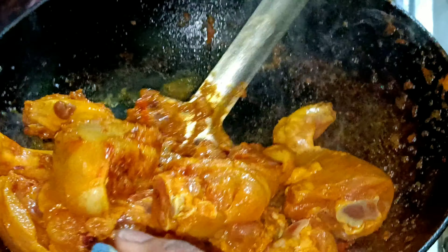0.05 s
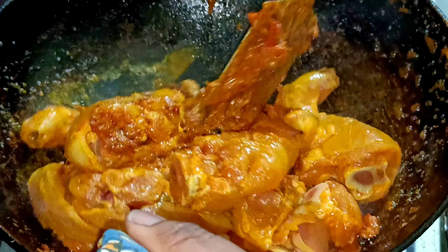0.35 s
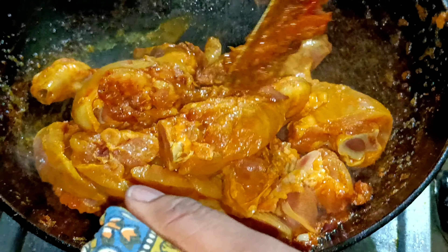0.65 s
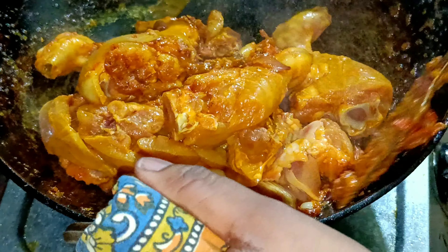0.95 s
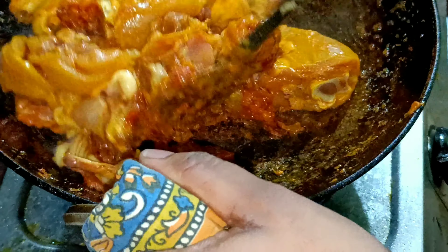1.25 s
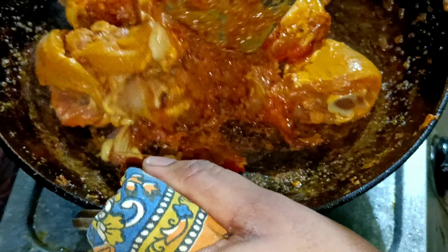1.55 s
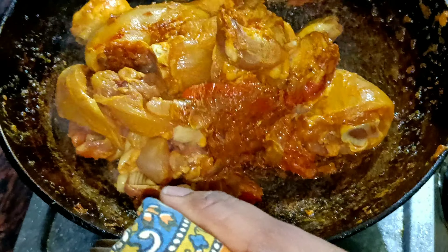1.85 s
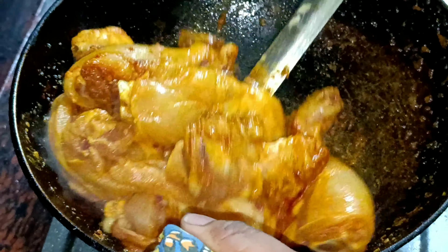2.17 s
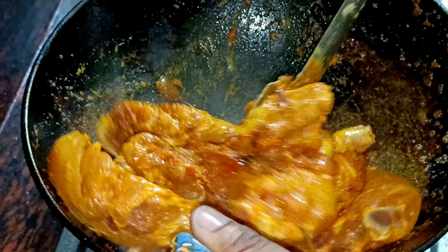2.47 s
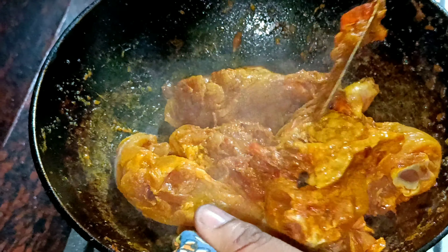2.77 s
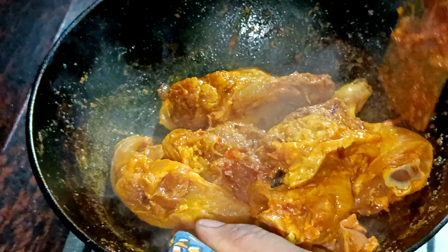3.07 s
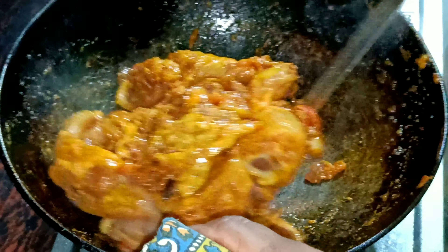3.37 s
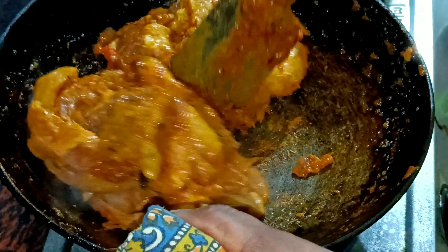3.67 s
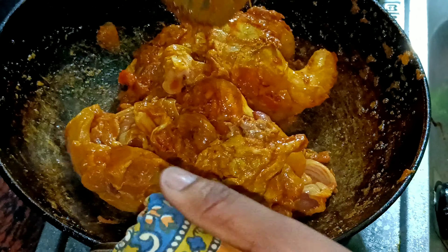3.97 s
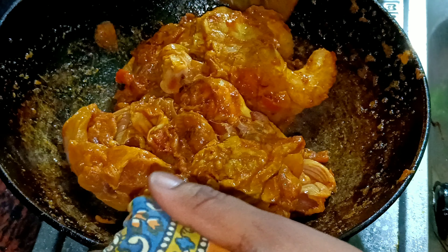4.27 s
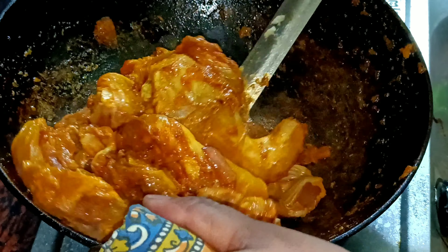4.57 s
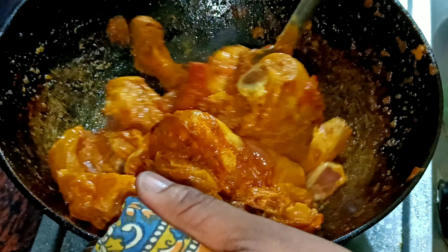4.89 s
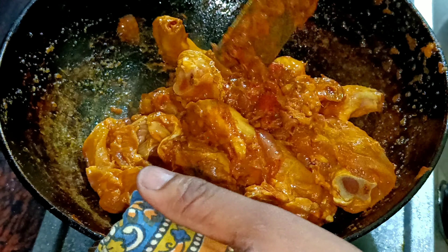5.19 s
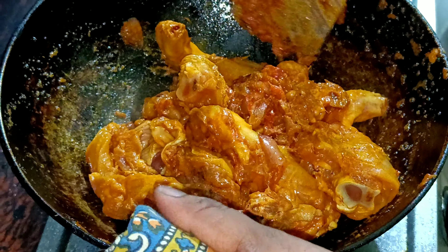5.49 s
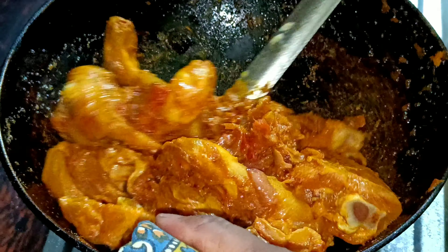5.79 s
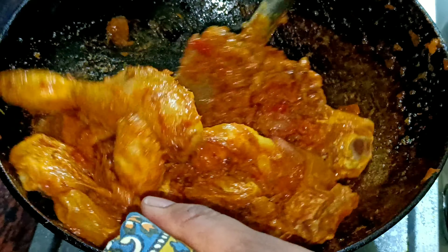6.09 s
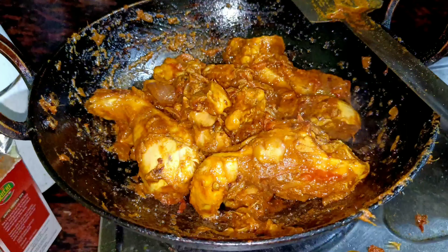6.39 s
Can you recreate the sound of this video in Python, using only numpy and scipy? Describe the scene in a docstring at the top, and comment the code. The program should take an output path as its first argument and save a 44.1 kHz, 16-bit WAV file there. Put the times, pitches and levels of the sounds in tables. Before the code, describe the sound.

In a kitchen with a low background rumble, hot oil sizzles close up from start to finish, rising and falling in quick, uneven waves as the food is stirred. A metal ladle strikes the pan at irregular moments, each clink ringing briefly. Further away, wooden thuds sound with a little room echo, three of them heavier and rebounding. The frying eases slightly toward the end.

```python
"""Food frying in a pan, close up, under a half-lifted aluminium lid: oil droplets burst and hiss.
Each stroke of a metal ladle swells the hiss; now and then the ladle clinks and rings the pan.
Dull knocks on wood come from across the kitchen, over a low rumble; the heavy ones rebound.
The right microphone port resonates near 6 kHz. The sound drops out briefly just before the end."""
import sys
import numpy as np
from scipy import signal
from scipy.fft import rfft, irfft, next_fast_len
from scipy.io import wavfile
from scipy.ndimage import uniform_filter1d, map_coordinates

SR = 44100
rng = np.random.default_rng(int(sys.argv[2]) if len(sys.argv) > 2 else 0)


def transcribe(signal):
    """Save signal, clipped to [-1, 1], as a 16-bit WAV file at the path in sys.argv[1]."""
    frames = np.atleast_2d(signal).T
    limited = np.clip(frames, -1, 1)
    pcm = np.round(limited * 32767).astype(np.int16)
    wavfile.write(sys.argv[1], SR, pcm)


N = 288413

# room sound, left against right: f/Hz, coherence
COHERENCE = [(25, 0.73), (60, 0.99), (250, 1), (500, 0.81), (1000, 0.028), (2000, 0.0094), (12000, 0.027)]
# bursting oil droplets: f/Hz, level/dB
SIZZLE_SPECTRUM = [(800, -18), (2500, 0.5), (6500, 1.5), (9200, -1.5), (12000, 1), (14000, 0),
                   (15600, -3.5)]
# frying hiss: f/Hz, level/dB
HISS_SPECTRUM = [(200, -29), (600, -15), (1280, -2.5), (1700, -0.5), (2100, -1), (3400, -1.5), (4800, -2.5),
                 (6000, -2.5), (6900, -4.5), (7800, -13), (9200, -42), (15600, -40)]
# kitchen rumble (bass) and soft scraping (above it): f/Hz, level/dB
RUMBLE_SCRAPE_SPECTRUM = [(20, -20), (50, -11.5), (90, -2.5), (130, 5), (260, -2.5), (400, 0), (600, -2),
                          (800, 2), (980, -0.5), (1250, 4.5), (1800, -8), (5000, -13.5)]
# ladle strokes: peak t/s, swell/s, hiss level/dB, sizzle level/dB, scrape level/dB
LADLE_STROKES = [(.09, 0.31, -42.5, -38.5, -33.5), (.5, 0.11, -37, -36, -39), (.83, 0.42, -39.5, -48, -50),
                 (1.26, 0.17, -36, -47, -34), (1.521, .06, -48, -33.5, -41), (1.68, 0.33, -33, -35.5, -48),
                 (2.17, 0.14, -33, -36.5, -39.5), (2.64, 0.37, -46.5, -36, -44),
                 (2.84, 0.18, -32.5, -44, -45), (3.13, 0.19, -36.5, -50, -44),
                 (3.41, 0.15, -35, -38.5, -37), (3.64, 0.21, -43.5, -37.5, -43.5),
                 (3.9, 0.14, -34.5, -37.5, -44.5), (4.42, 0.072, -36, -44, -55),
                 (4.561, 0.087, -33.5, -41, -36.5), (5.07, .12, -41.5, -37.5, -54),
                 (5.22, 0.14, -39, -52, -51), (5.84, 0.13, -40.5, -43.5, -42.5),
                 (6.07, .17, -58, -40.5, -57), (6.33, 0.096, -41, -41, -48), (6.52, 0.039, -38.5, -36, -56)]
# resonance between lid and pan: t/s, f/Hz, gain/dB
CAVITY_TRACK = [(0, 1300, 7.5), (.17, 1360, 10.5), (.4, 1550, 6.5), (.5, 2720, 5.5), (.7, 2650, 9.5),
                (1.08, 3220, 2), (1.55, 2500, 6.5), (1.85, 2120, 7.5), (2.5, 1920, -1.5), (3.2, 2350, 5),
                (3.702, 1550, -2), (4.25, 1540, 6), (4.44, 1710, -7), (4.57, 1370, 8), (4.75, 1390, -5),
                (5.5, 1850, 3), (5.96, 1250, -0.5), (6.54, 1680, 8)]
# distant knocks: t/s, level/dB, rattle/s
KNOCK_EVENTS = [(0.0, -43, .06), (0.961, -22, 0.074), (1.691, -41.5, 0.072), (2.266, -43.5, .08),
                (2.87, -19.5, 0.061), (3.276, -30.5, 0.022), (3.475, -37, 0.081), (3.532, -30, 0.02),
                (4.874, -41, 0.038), (5.031, -41.5, 0.043), (5.187, -24.5, 0.061), (5.865, -41, 0.045),
                (6.465, -29.5, .12)]
# knocked wood: f/Hz, width/Hz, level/dB
WOOD_MODES = [(125, 30, -6), (208, 50, -4), (265, 42, -6), (310, 36, -7), (369, 32, -1), (425, 36, -1.5),
              (500, 34, -4), (615, 40, -3.5), (695, 40, -9), (750, 36, -6), (815, 70, -6), (920, 60, -13),
              (1040, 90, -13), (1260, 80, -12), (1570, 60, -13)]
# kitchen reverberation: f/Hz, t60/s
WALL_DECAY = [(150, 0.71), (400, 1), (1000, 0.5), (3000, 0.33), (7000, 0.29), (14000, 0.053)]
# ladle on pan: t/s, level/dB, high ring f/Hz, its lift/dB, low ring f/Hz, body gain/dB
CLINK_EVENTS = [(1.0183, -15.5, 6750, 15, 1280, -3.5), (1.726, -31, 6060, 11, 400, -19),
                (2.077, -12, 6160, 8.5, 1560, -3), (2.165, -25, 5900, 4, 2120, -18),
                (2.19, -25, 5600, 11, 2670, -17), (3.2598, -21, 6100, 2.5, 2320, -2),
                (4.3901, -18, 7200, -4, 1240, 1.5), (4.4928, -23.5, 6000, 8, 2670, -1),
                (4.553, -22.5, 6000, -1, 1500, -0.5), (5.6581, -12.5, 5260, 7.5, 2210, -0.5)]
# pan and ladle: f/Hz, level/dB, t60/s
PAN_MODES = [(365, -13, .24), (415, -13, .17), (790, -18, .15), (1180, -10, .16), (1270, -14, .15),
             (1560, -19, .2), (2120, -15, .14), (2320, -14, .16), (2480, -16, .15), (2670, -18, .2),
             (3100, -14, .13), (3295, -15, .18), (4050, -19, .2), (5255, -4.5, .13), (5620, -13, .14),
             (6105, -6, .11), (6180, -8, .11), (6445, -10, .11), (6645, -12, .1), (6780, -7, .08),
             (7190, -11, .11), (7650, -11, .1), (8230, -10, .1), (8720, -14, .07), (10470, -11, .1)]
# ladle contact noise: f/Hz, level/dB
GRIT_SPECTRUM = [(150, -7), (400, -1), (3000, -2), (6500, 8), (8300, 2.5), (9500, -1.5), (12000, 0.5),
                 (15000, -6)]
# right microphone port: f/Hz, gain/dB
PORT_RESPONSE = [(150, 0), (380, 1.5), (600, -0.5), (1200, 0.5), (1700, 3), (2800, 2), (3900, 8.5),
                 (5000, 6), (5600, 11.5), (6050, 15), (6500, 12.5), (7500, 9), (9500, -4.5), (11500, 1),
                 (13200, 3), (15500, -1.5)]

CROSSOVER_HZ = 550  # rumble below, scrape above


def amp(db):
    """Decibels to gain."""
    return 10 ** (np.asarray(db) / 20)


def unit(x):
    """Scale to rms 1."""
    return x / np.sqrt(np.mean(x ** 2) + 1e-20)


def along(points, hz):
    """Rows of f/Hz, value, read on a log axis."""
    f, values = np.transpose(points)
    return np.interp(np.log(hz + 1), np.log(f + 1), values)


def colour(points):
    """Frequency response from rows of f/Hz, level/dB."""
    return lambda hz: amp(along(points, hz))


def wobble(rate_hz):
    """Smooth random curve, rate_hz knots a second."""
    knots = rng.standard_normal(int(N * rate_hz / SR) + 4)
    return map_coordinates(knots, [np.arange(N) * rate_hz / SR])


def filtered(x, response):
    """Apply a frequency response."""
    n = x.shape[-1]
    padded = next_fast_len(n + SR // 4)
    return irfft(rfft(x, padded) * response(np.fft.rfftfreq(padded, 1 / SR)), padded)[..., :n]


def diffuse(pair, response):
    """Colour two unrelated signals and spread them as in a room: coherent in the bass only; rms 1."""
    def mid_side(hz):
        angle = np.arccos(np.clip(along(COHERENCE, hz), -1, 1)) / 2
        return response(hz) * np.array([np.cos(angle), np.sin(angle)])
    mid, side = filtered(pair, mid_side)
    return unit(np.array([mid + side, mid - side]))


def add(track, start_s, sound):
    """Mix a sound into the track."""
    part = track[:, round(start_s * SR):][:, :sound.shape[1]]
    part += sound[:, :part.shape[1]]


def droplets(rate_hz, spread_db):
    """Tiny bursts at random times: many small, a few large."""
    bursting = rng.random((2, N)) < rate_hz / SR
    bursts = bursting * rng.standard_normal((2, N))
    size_db = spread_db * np.minimum(rng.exponential(size=(2, N)), 5)
    return unit(bursts * amp(size_db))


def flicker(x, depth_db, bands=4, frames=9):
    """Each narrow band swells and sinks by itself; rms 1."""
    z = signal.stft(x, nperseg=1024)[2]
    field = uniform_filter1d(rng.standard_normal(z.shape[1:]), bands, axis=0)
    field = unit(uniform_filter1d(field, frames, axis=1))
    return unit(signal.istft(z * amp(depth_db * field), nperseg=1024)[1][:, :N])


def fine_comb(x, tap_db, count=10):
    """Short random delays give the hiss a faint, fixed, tonal colour."""
    delays_s = rng.uniform(.0007, .009, (2, count))
    signs = rng.choice([-1, 1], (2, count))
    taps = np.zeros((2, SR // 25))
    taps[:, 0] = 1
    taps[[[0], [1]], (delays_s * SR).astype(int)] = signs * amp(tap_db)
    return unit(signal.fftconvolve(x, taps, axes=1)[:, :N])


def stirring(part, rest_db, drift_db_per_s):
    """Gain of one part of the frying: a sinking rest level plus a swell per stroke."""
    t = np.arange(N) / SR
    column = ("hiss", "sizzle", "scrape").index(part)
    power = amp(rest_db + drift_db_per_s * t) ** 2
    for peak_s, swell_s, *levels_db in LADLE_STROKES:
        width_s = np.where(t < peak_s, swell_s, 1.37 * swell_s)  # falls slower than it rises
        swell = np.exp(-((t - peak_s) / width_s) ** 2)
        power += (amp(levels_db[column]) * swell) ** 2
    return np.sqrt(power)


def lid_cavity(x, width_oct=.29):
    """The hollow under the lid: a broad resonance that glides as the lid tilts."""
    hz, t, z = signal.stft(x, SR, nperseg=512)
    knots_s, centre_hz, gain_db = np.transpose(CAVITY_TRACK)
    offset_oct = np.log2((hz[:, None] + 1) / np.interp(t, knots_s, centre_hz))
    bell_db = np.interp(t, knots_s, gain_db) * np.exp(-(offset_oct / width_oct) ** 2)
    return signal.istft(z * amp(bell_db), SR, nperseg=512)[1][:, :N]


def frying():
    """Droplets fizz in oil; stirring turns wet food onto hot metal, raises a hiss and scrapes the pan."""
    sizzle = diffuse(droplets(rate_hz=14000, spread_db=0.1), colour(SIZZLE_SPECTRUM))
    sizzle = flicker(sizzle, depth_db=2.5) * amp(.4 * wobble(rate_hz=24))
    sizzle *= stirring("sizzle", rest_db=-35, drift_db_per_s=-1.63)

    hiss = diffuse(droplets(rate_hz=16000, spread_db=1.0), colour(HISS_SPECTRUM))
    hiss = fine_comb(hiss, tap_db=-19)
    hiss = flicker(hiss, depth_db=2.0) * amp(.79 * wobble(rate_hz=25))
    hiss *= stirring("hiss", rest_db=-39.5, drift_db_per_s=-0.41)

    scrape = diffuse(rng.standard_normal((2, N)), colour(RUMBLE_SCRAPE_SPECTRUM))
    scrape = flicker(scrape, depth_db=3.5)
    scrape = filtered(scrape, lambda hz: 1 - 1 / (1 + (hz / CROSSOVER_HZ) ** 4))
    scrape *= stirring("scrape", rest_db=-41, drift_db_per_s=-0.67)
    return sizzle + lid_cavity(hiss) + scrape


def rumble():
    """Steady low noise of the kitchen."""
    air = diffuse(rng.standard_normal((2, N)), colour(RUMBLE_SCRAPE_SPECTRUM))
    return amp(-42.5) * filtered(air, lambda hz: 1 / (1 + (hz / CROSSOVER_HZ) ** 4))


def wood(hz, bright_hz):
    """Response of struck wood: modes of alternating sign, cut above bright_hz and below 60 Hz."""
    modes = sum((-1) ** k * amp(db) * 1j * hz * width_hz / (mode_hz ** 2 - hz ** 2 + 1j * hz * width_hz)
                for k, (mode_hz, width_hz, db) in enumerate(WOOD_MODES))
    return modes / (1 + 1j * hz / bright_hz) ** 2 * (1j * hz / (60 + 1j * hz)) ** 2


def knocks(soft_hz=515, hard_hz=1820):
    """Blows thud through wood, which rattles briefly; soft ones are duller and swell more slowly."""
    out, t = np.zeros((2, N)), np.arange(SR // 3) / SR
    for start_s, db, rattle_s in list(KNOCK_EVENTS) + rebounds():
        force = np.clip(amp(db + 23), 0, 1)
        bright_hz = soft_hz + (hard_hz - soft_hz) * force ** 2
        thud = filtered(signal.unit_impulse(len(t)), lambda hz: wood(hz, bright_hz) / (1 + 1j * hz / 600))
        thud *= force / np.abs(thud).max()
        low_cut_hz = 100 + 130 * (1 - force)
        attack_s = .0027 + .0047 * (1 - force)
        noise = rng.standard_normal((2, len(t)))
        rattle = diffuse(noise, lambda hz: wood(hz, bright_hz) * hz ** 2 / (hz ** 2 + low_cut_hz ** 2))
        rattle *= (1 - np.exp(-t / attack_s)) / (1 + (t / rattle_s) ** 5)
        add(out, start_s, amp(db - 2) * kitchen_reverb(3 * thud + 1.156 * rattle, wet_db=-9.5))
    return out


def rebounds(above_db=-28, flight_s=.217, shrink=.6, loss_db=8.5, rattle_s=.033):
    """Hard knocks bounce twice, ever quicker and weaker: t/s, level/dB, rattle/s."""
    delays_s = [flight_s, flight_s * (1 + shrink)]
    return [(start_s + delay_s, db - loss_db * k, rattle_s)
            for start_s, db, _ in KNOCK_EVENTS if db > above_db
            for k, delay_s in enumerate(delays_s, 1)]


def kitchen_reverb(sound, wet_db):
    """Direct sound plus wall reflections, each frequency decaying at its own rate."""
    noise = diffuse(rng.standard_normal((2, SR * 3 // 4)), np.ones_like)
    hz, t, z = signal.stft(noise, SR, nperseg=256)
    decay = amp(-60 * t / along(WALL_DECAY, hz)[:, None])
    response = signal.istft(z * decay, SR, nperseg=256)[1]
    response *= amp(wet_db) / np.linalg.norm(response[0])
    response[:, 0] += 1
    return signal.fftconvolve(sound, response, axes=1)


def ladle_clinks(low_lift_db=9, body_top_hz=4500, grit_t60_s=.14, attack_s=.00046, left_db=3):
    """Each contact scrapes briefly and rings the pan, favouring two pitches set by where it lands."""
    out, t = np.zeros((2, N)), np.arange(SR // 3) / SR
    hz, mode_db, t60_s = np.transpose(PAN_MODES)
    near = lambda centre_hz: np.exp(-((hz - centre_hz) / 220) ** 2)
    balance = amp([[left_db / 2], [-left_db / 2]])
    for start_s, db, high_hz, high_lift_db, low_hz, body_db in CLINK_EVENTS:
        lift_db = high_lift_db * near(high_hz) + low_lift_db * near(low_hz)
        ring_db = mode_db + lift_db + body_db * (hz < body_top_hz)
        phase = rng.uniform(0, 2 * np.pi, (2, len(hz), 1))
        modes = np.sin(2 * np.pi * hz[:, None] * t + phase) * amp(-60 * t / t60_s[:, None])
        ring = (amp(ring_db)[:, None] * modes).sum(1)
        grit = diffuse(rng.standard_normal((2, len(t))), colour(GRIT_SPECTRUM))
        grit *= amp(-2 - 60 * t / grit_t60_s)
        contact = (ring + grit) * (1 - np.exp(-t / attack_s)) * balance
        add(out, start_s, amp(db - 9.5) * kitchen_reverb(contact, wet_db=-5))
    return out


def scene():
    """All kitchen sources, stereo."""
    return frying() + ladle_clinks() + knocks() + rumble()


def record(dry, dropout_s=(6.421, 6.456), top_hz=15800):
    """Right port resonance, a brief dropout, treble cut-off."""
    ports = np.array([dry[0], filtered(dry[1], colour(PORT_RESPONSE))])
    t = np.arange(N) / SR
    live = (t < dropout_s[0]) | (t > dropout_s[1])
    gate = uniform_filter1d(live * 1., size=SR // 200)  # 5 ms ramps
    return filtered(ports * gate, lambda hz: hz < top_hz)


dry = scene()
out = record(dry)
transcribe(out)
```